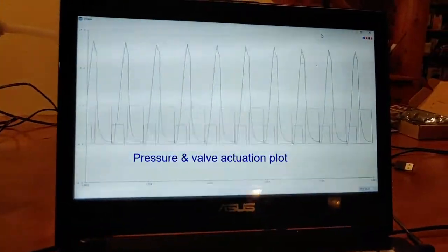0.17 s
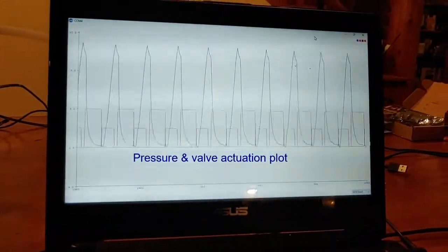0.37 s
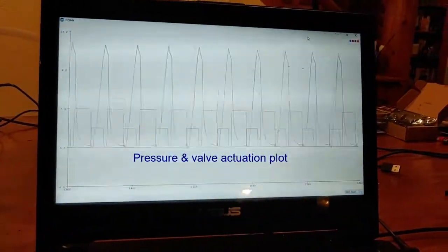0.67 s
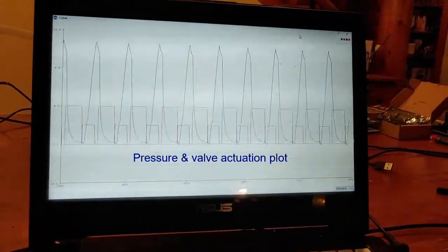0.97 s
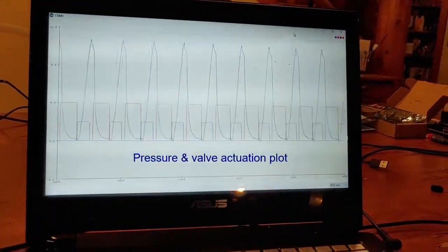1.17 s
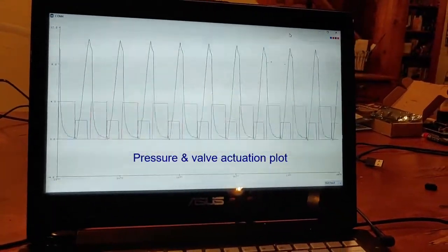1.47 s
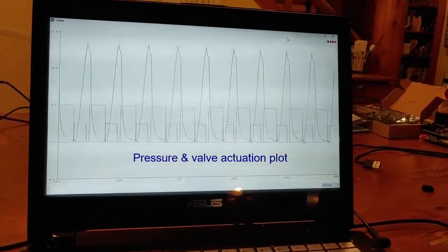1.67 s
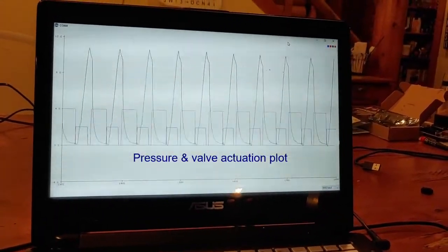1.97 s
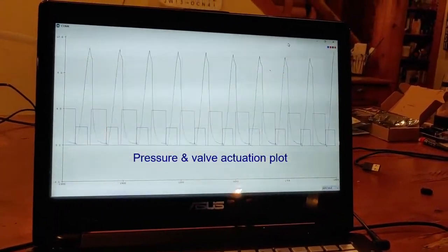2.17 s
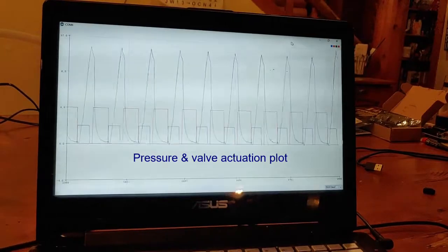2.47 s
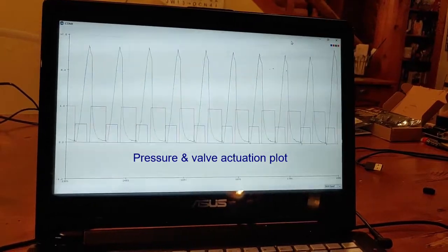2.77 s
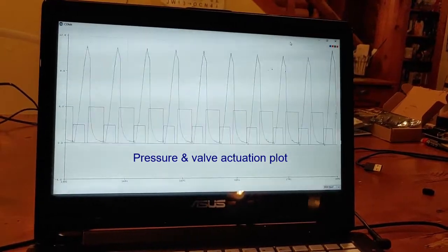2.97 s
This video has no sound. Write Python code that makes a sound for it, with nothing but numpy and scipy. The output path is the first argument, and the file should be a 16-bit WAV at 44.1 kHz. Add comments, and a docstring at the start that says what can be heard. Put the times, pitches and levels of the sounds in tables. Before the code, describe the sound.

Pneumatic valve snaps, a steady bright air hiss follows, then a fading vent and final snapping puff

```python
"""Pneumatic breathing machine, one cycle

A valve snaps and air hisses into a box for two seconds. A second valve lets it vent through a
whistling hose, and a third snaps with a fading puff. The air is shaped noise, the snaps are short
noise bursts, and the table rings in decaying sine modes over a low room rumble.
A phone with two unlike microphone ports stands near; peaks above its ceiling are clipped.
"""
import sys
import numpy as np
from scipy import signal
from scipy.fft import rfft, irfft, next_fast_len
from scipy.io import wavfile
from scipy.ndimage import uniform_filter1d

SR = 44100
rng = np.random.default_rng(int(sys.argv[2]) if len(sys.argv) > 2 else 0)


def put_to_file(sound):
    """Save the sound as 16-bit audio at rate SR, in the file named by the first command-line argument."""
    columns = np.atleast_2d(sound).T  # one column per channel
    safe = np.clip(columns, -1, 1)
    whole_steps = np.round(safe * 32767)
    wavfile.write(sys.argv[1], SR, whole_steps.astype(np.int16))


N = 136710  # length in samples, 3.1 s


def amp(db):
    """Turns decibels into an amplitude factor."""
    return 10 ** (np.asarray(db) / 20)


def evened(x):
    """Scales a signal to an RMS of 1."""
    return x / np.sqrt(np.mean(x ** 2) + 1e-20)


def gains(colour, peaks, hz):
    """Gain per port: a smooth colour lifted by narrow resonances, then levelled to an RMS of 1."""
    f, left_db, right_db = np.transpose(colour)
    log_hz = np.log(hz + 1)  # the added 1 avoids log(0)
    gain = amp([np.interp(log_hz, np.log(f), port_db) for port_db in (left_db, right_db)])
    for centre_hz, width_hz, lift_db in peaks:
        offset = 2 * (hz - centre_hz) / width_hz
        gain = gain * (1 + (amp(lift_db) - 1) / (1 + offset ** 2))
    return gain / np.sqrt(np.mean(gain ** 2))


def coloured(direct, echo, colour, peaks=()):
    """Mixes direct sound, which reaches the right port later, with echo and colours both ports."""
    # likeness of the two ports: f/Hz, share of power heard directly (0-1); the rest is room echo
    direct_share = [(300, 0.88), (1000, 0.34), (2500, 0.37), (4000, 0.57), (5500, 0.58), (6500, 0.26),
                    (7900, 0.69), (9000, 0.37), (10300, 0.34), (12000, 0.14)]
    right_lag_s = 0.0003988
    size = next_fast_len(N + 8192)
    hz = np.fft.rfftfreq(size, 1 / SR)
    share = np.clip(np.interp(hz, *np.transpose(direct_share)), 0, 1)
    # turning the phase in step with frequency delays the sound
    lag = np.exp(-2j * np.pi * hz * np.array([[0], [right_lag_s]]))
    direct_part = np.sqrt(share) * lag * rfft(direct, size)
    echo_part = np.sqrt(1 - share) * rfft(echo, size)
    both = direct_part + echo_part
    return irfft(both * gains(colour, peaks, hz), size)[:, :N]


def in_room(size, colour, peaks=()):
    """Noise of a given size over time, with an echo that lingers and differs at each port."""
    echo_t60_s = 0.25  # time for the echo to fall by 60 dB
    keep = np.exp(-2 * np.log(1000) / (echo_t60_s * SR))  # echo power kept per sample
    linger = np.sqrt(signal.lfilter([1 - keep], [1, -keep], size ** 2))
    direct = size * rng.standard_normal(N)
    echo = linger * rng.standard_normal((2, N))
    return coloured(direct, echo, colour, peaks)


def jet(flow, colour, peaks=()):
    """Turbulent air: noise whose level follows the flow and flutters at random."""
    flutter_db, flutter_s = 0.5, 0.003  # RMS depth, averaging time
    s, flow_db = np.transpose(flow)
    level_db = np.interp(np.arange(N) / SR, s, flow_db, left=-120, right=-120)
    flutter = evened(uniform_filter1d(rng.standard_normal(N), round(flutter_s * SR)))
    return in_room(amp(level_db + flutter_db * flutter), colour, peaks)


def room_floor():
    """Low rumble of the room: steady noise, nearly alike at both ports."""
    # colour of the rumble: f/Hz, relative left level/dB, relative right level/dB
    floor_colour = [(20, -32, -30), (35, -23, -17), (68.3, -1.5, 1.5), (126, -8.5, -13.5), (226, -20, -20),
                    (600, -14.5, -16), (1500, -35, -24), (5000, -42, -47), (9000, -60, -60)]
    floor_db = -59.5
    rumble = coloured(rng.standard_normal(N), rng.standard_normal((2, N)), floor_colour)
    return amp(floor_db) * evened(rumble)


def table_knocks():
    """Each knock shakes the table briefly; its modes ring on as decaying sines."""
    # what the table rings with: f/Hz, relative level/dB, full time to fall by 60 dB t60/s
    table_modes = [(66, -2, 0.42), (138.4, 4, 0.37), (272, -7.5, 0.4), (394, -4.5, 0.31), (468, 3, 0.096),
                   (559, -17, 0.13), (700, -5, 0.098), (890, -2, 0.11), (1040, -6, 0.13)]
    # knocks: start t/s, level/dB, strongest near f/Hz, shake length/s, share of full ring time (0-1)
    knock_list = [(0.119, -24.5, 248, 0.038, 1.), (0.314, -37.5, 390, 0.063, 0.64),
                  (2.13, -36, 500, 0.02, 0.26), (2.171, -43, 60, .05, 0.2), (2.438, -47, 270, 0.013, .4),
                  (2.632, -38, 250, 0.043, 0.4), (2.66, -40.5, 150, 0.11, 0.7)]
    octave_db = -4  # modes weaken by this per octave away from the strongest frequency
    out = np.zeros(N)
    t = np.arange(SR // 2) / SR
    for s, knock_db, near_hz, length, ring in knock_list:
        ringing = np.zeros(len(t))
        push = np.sin(np.pi * np.minimum(t / length, 1) ** 0.64) ** 2  # swells and fades once
        for hz, db, t60 in table_modes:
            shake = rng.standard_normal(len(t)) * push
            response = amp(-60 * t / (t60 * ring)) * np.sin(2 * np.pi * hz * t)
            mode = signal.fftconvolve(shake, response)[:len(t)]
            mode_db = db + octave_db * abs(np.log2(hz / near_hz))
            ringing += amp(mode_db) * mode / abs(mode).max()
        part = out[round(s * SR):][:len(t)]  # a view: adding to it fills out
        part += amp(knock_db) * ringing[:len(part)]
    return out * amp([[1.5], [-1.5]])  # left a little louder than right


def valve_clicks():
    """Valve plungers land: noise bursts that start at once and die away exponentially."""
    # clicks: start t/s, starting level/dB, decay to 37 % in amplitude/s
    click_list = [(0.1242, -3, 0.0013), (0.135, -14, 0.00086), (2.133, -4, 0.0013), (2.638, 1, 0.0023),
                  (2.646, -9, 0.0029)]
    # colour of the clicks: f/Hz, relative left level/dB, relative right level/dB
    click_colour = [(300, -19.5, -16), (1500, -14, -11.5), (3000, -5.5, -3), (5030, -16, -6.5),
                    (7500, 11, -9.5), (9900, -7, 4.5), (12500, -11.5, -12), (15400, -18, -34)]
    t = np.arange(N) / SR
    size = np.zeros(N)
    for s, db, decay in click_list:
        fade = np.exp(-np.maximum(t - s, 0) / decay)
        size += amp(db) * (t >= s) * fade
    return in_room(size, click_colour)


def fizz_jet():
    """Very high, faint fizz of air, made as bright jet noise."""
    # air flow: t/s, level/dB
    fizz_flow = [(.12, -70), (.16, -34), (1.4, -33.5), (2.13, -28), (2.18, -41), (2.36, -39), (2.6, -57),
                 (2.63, -70)]
    # colour of the fizz: f/Hz, relative left level/dB, relative right level/dB
    fizz_colour = [(8900, -38, -46), (11300, 6.5, -1), (12500, -2, -30), (14000, 0.5, -52),
                   (15800, -1, -60)]
    return jet(fizz_flow, fizz_colour)


def opening_jet():
    """Short first rush of air around the first snap, made as jet noise."""
    # air flow: t/s, level/dB
    opening_flow = [(.113, -62), (.117, -20), (.121, -22), (.13, -17), (.155, -18), (.18, -32)]
    # colour of the rush: f/Hz, relative left level/dB, relative right level/dB
    opening_colour = [(800, -10.5, -20.5), (1500, -28, -14.5), (2500, -18, -11), (3500, -12, -5.5),
                      (4700, -20, -5.5), (5500, -9, -8), (6600, -16, -28), (7600, 2.5, -18),
                      (8400, -3.5, -22), (9300, -11, -18), (10500, -24, -19), (11800, -30, -32),
                      (13000, -75, -74), (15500, -49, -75)]
    return jet(opening_flow, opening_colour)


def puff_jet():
    """Fading puff at the third snap: jet noise that starts loud and dies away."""
    # air flow: t/s, level/dB
    puff_flow = [(2.624, -70), (2.63, -5), (2.637, -15), (2.645, -15.5), (2.68, -15), (2.76, -20),
                 (2.86, -33.5), (2.95, -53)]
    # colour of the puff: f/Hz, relative left level/dB, relative right level/dB
    puff_colour = [(300, -23, -22), (796, -25.5, -24.5), (1530, -23, -20), (2260, -15.5, -8),
                   (3380, -28, -27), (5150, -29, -15.5), (5820, -1, -6), (7240, 6, -18), (7600, 7.5, -19),
                   (8340, -5, -5), (9000, -5, -20), (9500, -11, -4), (11300, -29, -22.5), (12500, -32, -44),
                   (14000, -40, -52), (15500, -51, -75)]
    return jet(puff_flow, puff_colour)


def hose_jet():
    """Air in the hose: jet noise that narrow resonances make whistle."""
    # air flow: t/s, level/dB
    hose_flow = [(0, -32), (.03, -60), (.06, -77), (.1, -80), (2.13, -75), (2.16, -26.5), (2.3, -26.5),
                 (2.45, -22.5), (2.62, -22.5), (2.8, -27.5), (2.95, -28), (3.1, -32.5)]
    # colour of the hose: f/Hz, relative left level/dB, relative right level/dB
    hose_colour = [(300, -29, -33), (690, -36, -35), (1450, -21, -24), (2040, -18, -7.5), (2880, -16, -10),
                   (3930, -17, -10.5), (4960, -24, -5.5), (5500, -9, -21), (6100, -9.5, -15),
                   (7180, 5, -20), (8420, -11.5, -25), (9200, -37, -32), (10500, -75, -38),
                   (11500, -75, -75), (12500, -75, -63)]
    # narrow resonances: f/Hz, width/Hz, lift/dB
    hose_peaks = [(960, 140, 14), (1744, 80, 14.8), (2348, 52, 16.8), (3090, 23, 18.7), (3300, 56, 10),
                  (3460, 30, 9), (3870, 29, 15), (4220, 50, 12), (4870, 57, 6), (5190, 45, 5.1),
                  (5870, 38, 3.3), (6500, 51, 4.4)]
    return jet(hose_flow, hose_colour, hose_peaks)


def vent_jet():
    """Air venting after the second snap: jet noise that weakens and then stops."""
    # air flow: t/s, level/dB
    vent_flow = [(2.136, -45), (2.146, -9.5), (2.25, -11.5), (2.4, -13.5), (2.55, -19.5), (2.635, -20),
                 (2.65, -60)]
    # colour of the vent: f/Hz, relative left level/dB, relative right level/dB
    vent_colour = [(300, -44, -45.5), (800, -54, -47), (1510, -37, -35), (2510, -32, -25.5),
                   (3240, -19, -13), (4200, -18, -6.5), (5120, -19.5, -4.5), (5230, -13, -21),
                   (5900, -16, -20), (6640, -4, -10), (7260, 1, -26), (7830, -7.5, -9.5), (8300, -3.5, -17),
                   (9140, -27.5, -25), (9800, -30, -21.5), (10850, -40, -36), (13000, -72, -70)]
    # narrow resonances: f/Hz, width/Hz, lift/dB
    vent_peaks = [(3080, 91, 6.4), (4240, 50, 4.5), (5080, 43, 6.3), (6000, 60, 4), (6350, 70, 4)]
    return jet(vent_flow, vent_colour, vent_peaks)


def fill_jet():
    """Air hissing into the box for two seconds: jet noise with the narrow resonances of the box."""
    # air flow: t/s, level/dB
    fill_flow = [(.15, -46), (.158, -10.5), (.22, -10), (.6, -10), (1.4, -11), (2.13, -10.5), (2.145, -46)]
    # colour of the hiss: f/Hz, relative left level/dB, relative right level/dB
    fill_colour = [(294, -44.5, -43), (775, -45, -47.5), (1506, -32.5, -34), (2040, -25, -23),
                   (3010, -24.5, -24), (3690, -20.5, -11), (4200, -13, -2.5), (4850, -21, -1.5),
                   (5240, -7, 1.5), (6120, -9.5, -6.5), (6480, -6, -32.5), (7590, 2.5, -19.5),
                   (8070, -5.5, -20), (8600, -12.5, -17.5), (8900, -12, -44), (9650, -21, -19),
                   (10940, -19.5, -18), (11800, -30.5, -31), (12900, -70, -75)]
    # narrow resonances (a negative lift is a dip): f/Hz, width/Hz, lift/dB
    box_peaks = [(1430, 120, 9), (2389, 46, 10), (3000, 320, 8), (3590, 27, 10.5), (3890, 21, 8),
                 (4110, 47, 6.5), (4250, 30, 6.5), (4300, 40, 1.5), (4643, 29, 7), (4810, 23, 7.5),
                 (4910, 37, 11.5), (5120, 24, 3), (5410, 29, 8.5), (6680, 40, 5), (7120, 39, 5.5),
                 (7490, 50, 5), (7590, 31, -2), (7780, 45, 6), (8560, 66, 7), (9900, 160, 0.5),
                 (10400, 95, -7)]
    return jet(fill_flow, fill_colour, box_peaks)


def scene():
    """Adds the room, the table, the valves and all the air jets."""
    background = room_floor() + table_knocks()
    faint_air = fizz_jet() + opening_jet()
    main_air = puff_jet() + hose_jet() + vent_jet() + fill_jet()
    return background + valve_clicks() + faint_air + main_air


def record(dry):
    """The microphones clip peaks above the ceiling; a low-pass filter then limits the treble."""
    ceiling, edge_hz = 1, 15830
    cut = np.clip(dry, -ceiling, ceiling)
    low_pass = signal.firwin(511, edge_hz, window=("kaiser", 9), fs=SR)
    return signal.oaconvolve(cut, low_pass[None], "same")


dry = scene()
out = record(dry)
put_to_file(out)
```